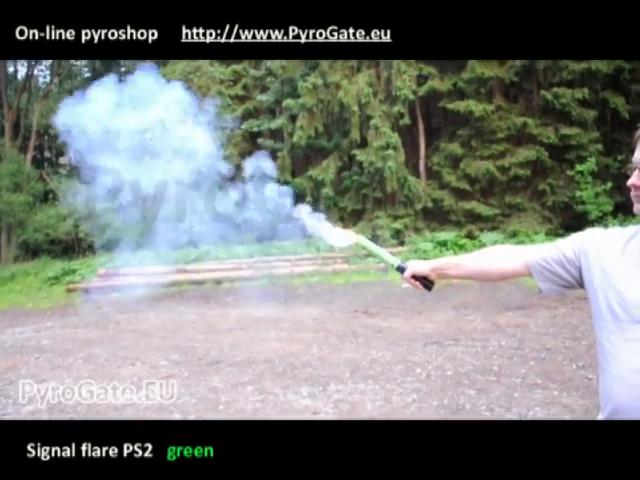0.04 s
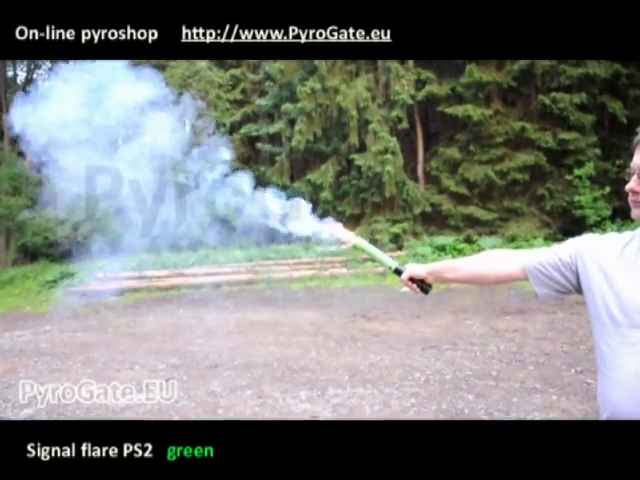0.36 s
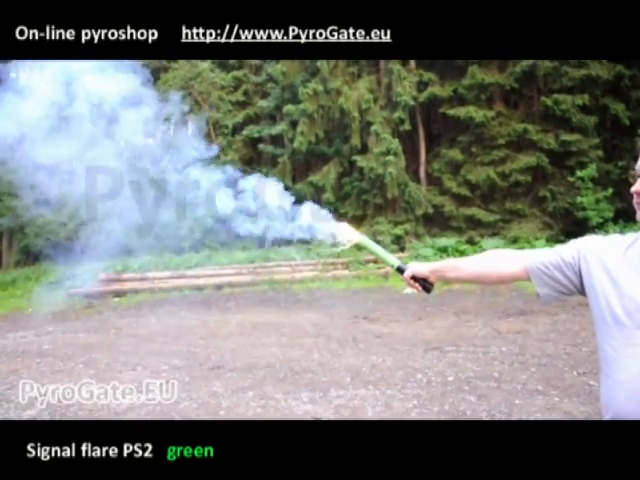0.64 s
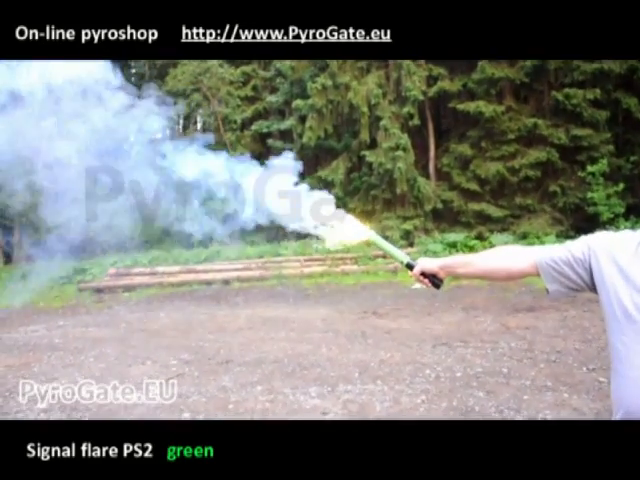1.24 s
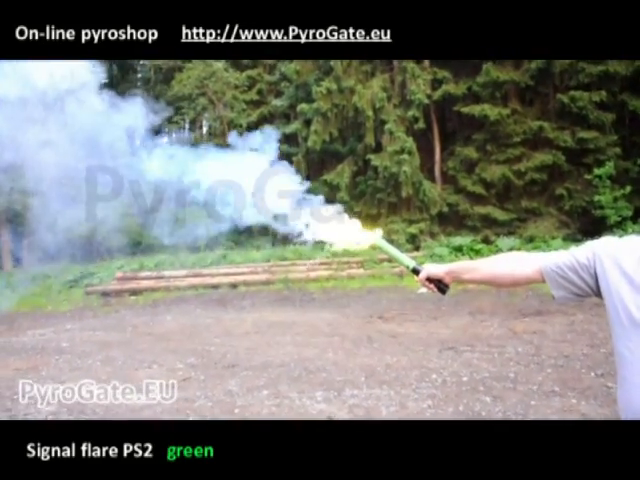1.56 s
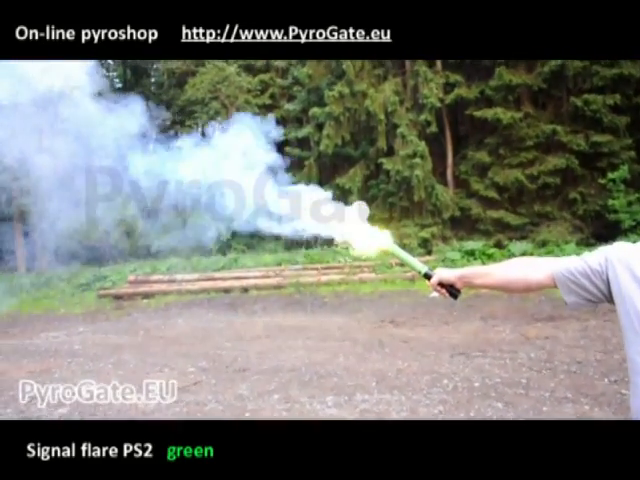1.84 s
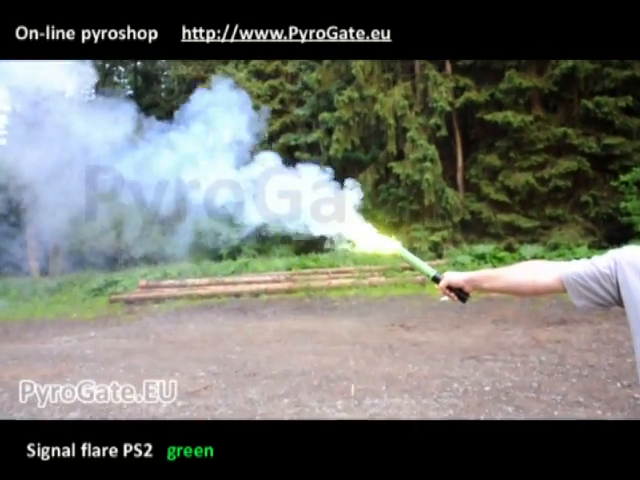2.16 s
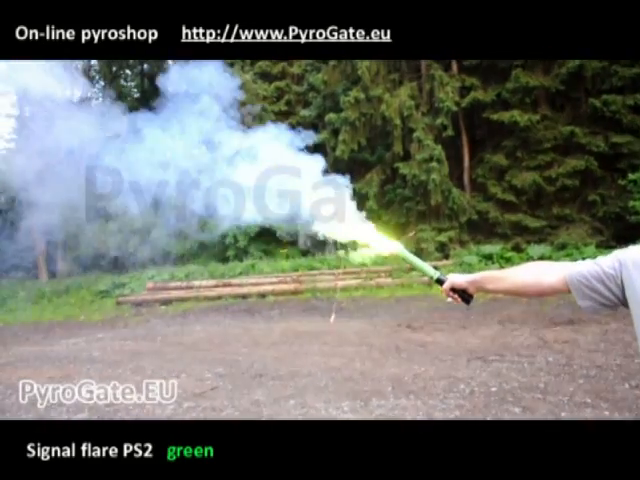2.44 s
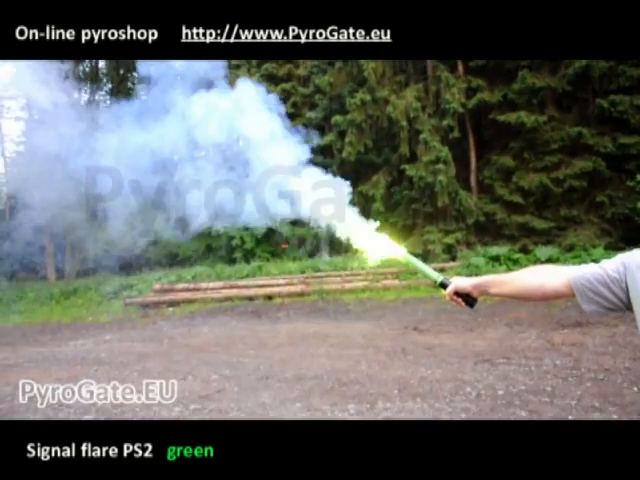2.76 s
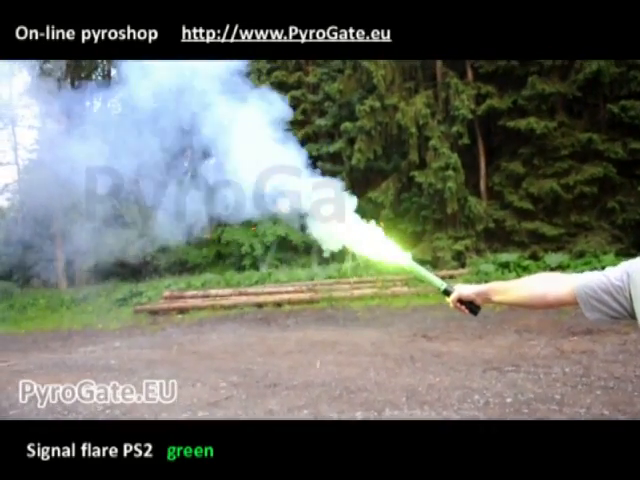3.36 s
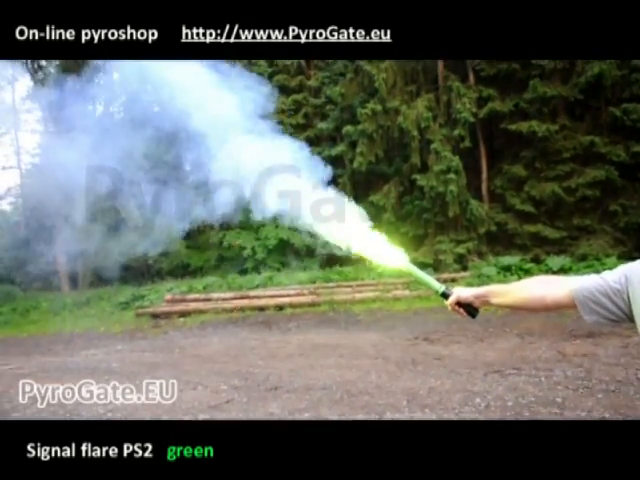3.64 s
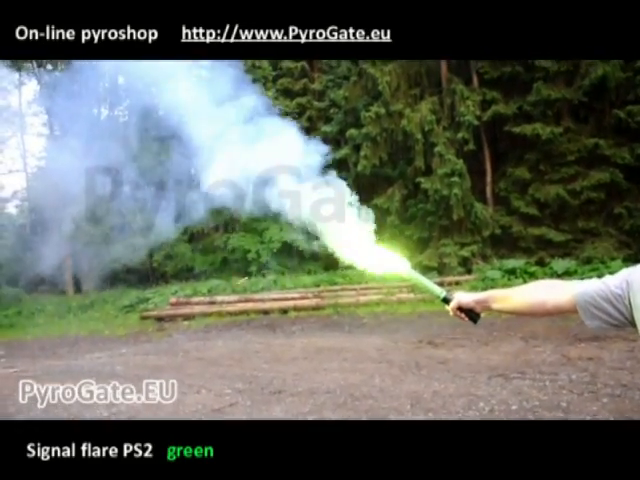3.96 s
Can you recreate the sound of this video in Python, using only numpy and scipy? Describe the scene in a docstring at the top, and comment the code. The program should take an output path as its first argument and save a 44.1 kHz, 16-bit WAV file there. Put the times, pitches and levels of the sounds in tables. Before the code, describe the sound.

A handheld flare hisses and crackles outdoors, growing louder with a surging roar.

```python
"""A hand-held signal flare burns outdoors, at arm's length from the microphone.
From the start its gas jet hisses, squeaks and crackles over a faint rumble of open air.
Early on and up to 2.6 s, single grains snap, and sparks spurt and zip away.
From about 1.2 s the growing flame roars in surges, while the tiny bursts of the burning charge
crowd ever closer until they merge with the hiss. Ground, holder and trees reflect the sound."""
import sys
import numpy as np
from scipy import signal
from scipy.fft import rfft, irfft, next_fast_len
from scipy.io import wavfile
from scipy.ndimage import uniform_filter1d, map_coordinates

SR = 44100
rng = np.random.default_rng(int(sys.argv[2]) if len(sys.argv) > 2 else 0)


def generate_wav(signal):
    """Clip the signal to [-1, 1] and save it as 16-bit WAV at the path in sys.argv[1]."""
    frames = np.transpose(np.atleast_2d(signal))
    scaled = np.clip(frames, -1, 1) * 32767
    pcm = np.round(scaled).astype(np.int16)
    wavfile.write(sys.argv[1], SR, pcm)


N = 176400  # 4 s


def amp(db):
    """Decibels to gain."""
    return 10 ** (np.asarray(db) / 20)


def unit(x):
    """Scale to rms 1."""
    return x / np.sqrt(np.mean(x ** 2) + 1e-20)


def seconds():
    """The time of each sample."""
    return np.arange(N) / SR


def curve(rows):
    """(time [s], value) points joined by straight lines."""
    return np.interp(seconds(), *np.transpose(rows))


def wobble(knots_per_s):
    """A smooth random curve."""
    return map_coordinates(rng.standard_normal(4096), [seconds() * knots_per_s], mode="wrap")


def filtered(x, response):
    """x through a response given as a function of frequency."""
    size = next_fast_len(N + 8192)
    return irfft(rfft(x, size) * response(np.fft.rfftfreq(size, 1 / SR)), size)[:N]


def coloured(x, spectrum):
    """x through a spectrum of (frequency [Hz], gain [dB]) points."""
    hz, db = np.transpose(spectrum)
    return filtered(x, lambda f: amp(np.interp(np.log(f + 1), np.log(hz), db)))


def rush(spectrum, patchy_db):
    """Turbulent noise of rms 1, with patches of random gain in frequency and time."""
    cells = signal.stft(rng.standard_normal(N), nperseg=512)[2]
    patches = uniform_filter1d(rng.standard_normal(cells.shape), size=5, axis=0)
    patches = uniform_filter1d(patches, size=8, axis=1)
    noise = signal.istft(cells * amp(patchy_db * unit(patches)), nperseg=512)[1][:N]
    return unit(coloured(noise, spectrum))


# the open air around the microphone (frequency [Hz], relative level [dB])
AIR_SPECTRUM = [(20, -18.5), (45, -4.5), (80, -4), (200, 4), (500, -8.5), (2000, -34)]
def open_air(level_db=-64.5):
    """The air of the clearing rumbles faintly and steadily."""
    return amp(level_db) * rush(AIR_SPECTRUM, patchy_db=0.5)


# the gas hiss at arm's length (frequency [Hz], relative level [dB])
HISS_SPECTRUM = [(100, -29), (700, -14.5), (1500, -14.5), (2200, -6.5), (2900, -5.5), (3500, 0),
                 (4300, 1.5), (5000, -1.5), (5500, -4.5), (6100, -3), (7000, -19)]
def hiss(start_db=-5.5, db_per_s=0.6):
    """Turbulent gas streams out of the flare."""
    return amp(start_db + db_per_s * seconds()) * rush(HISS_SPECTRUM, patchy_db=1.5)


# one burst of the charge, heard close up (frequency [Hz], relative level [dB])
BURST_SPECTRUM = [(100, -33.5), (700, -27.5), (1500, -9.5), (2800, -7.5), (3600, -2.5), (4400, -0.5),
                  (4900, 3.5), (5500, 1.5), (6100, -5), (7000, -14)]
def bursts(per_s, spread_db=10.5, limit_sigmas=1.66):
    """Pressure kicks of widely varying size at random moments; rms 1, equally strong at any rate."""
    chance = np.clip(per_s / SR, 1e-4, 1)
    fired = rng.random(N) < chance
    sizes = amp(spread_db * np.minimum(rng.standard_normal(N), limit_sigmas))
    kicks = fired * sizes * rng.choice([-1, 1], N) / np.sqrt(chance)
    return unit(coloured(kicks, BURST_SPECTRUM))


def crackle(start_per_s=1500, doubling_s=1.5, start_db=-1.5, db_per_s=-0.64):
    """Tiny bursts of the charge come ever denser as the burn spreads."""
    t = seconds()
    gain_db = start_db + db_per_s * t + 1.6 * wobble(220)
    return amp(gain_db) * bursts(start_per_s * 2 ** (t / doubling_s))


def squeaks(per_s=380, centre_hz=4998, decay_s=0.0018, spread_db=2.5, gain_db=-9):
    """Gas squeaks out of tiny pores in the charge: whistles of a few milliseconds, each at its own pitch."""
    gap, pitch, life, size = rng.standard_normal((2400, 4)).T[:, :, None]
    start_s = np.cumsum(np.abs(gap), axis=0) * np.sqrt(np.pi / 2) / per_s
    t = np.arange(SR // 50) / SR
    age = t / (decay_s * np.exp(0.48 * life))
    hz = centre_hz * np.exp(0.08 * pitch)
    whistles = amp(spread_db * size) * age * np.exp(-age) * np.sin(2 * np.pi * hz * t)
    samples = (start_s * SR).astype(int) + np.arange(len(t))
    return amp(gain_db) * unit(np.bincount(samples.ravel(), whistles.ravel(), N)[:N])


# strength of the jet, an arm's length from the microphone (time [s], level [dB])
JET_STRENGTH = [(0, -45.5), (0.2, -47), (0.25, -44), (0.43, -47.5), (0.6, -45.5), (0.83, -45.5),
                (0.98, -42.5), (1.45, -42.5), (1.9, -39.5), (2.2, -39.5), (2.45, -36.5), (2.62, -35.5),
                (2.8, -36.5), (3.14, -33), (3.3, -36), (3.34, -31.5), (3.52, -34), (3.6, -32), (3.7, -36),
                (3.75, -33), (3.82, -34), (4.0, -35)]
def jet():
    """Hiss, crackle and squeaks share the gas jet's rising, fluttering strength."""
    strength_db = curve(JET_STRENGTH) + 0.61 * wobble(15) + 0.8 * wobble(70)
    return amp(strength_db) * (hiss() + crackle() + squeaks())


# surges of the flame's roar and of its plume, at the same distance (time [s], level [dB])
ROAR_SURGES = [(0, -59.5), (0.4, -59.5), (0.62, -56.5), (1.1, -56), (1.25, -47), (1.42, -54.5),
               (1.8, -53.5), (1.86, -49.5), (2.32, -48), (2.42, -42.5), (2.55, -49.5), (2.68, -42.5),
               (2.85, -48.5), (2.92, -40.5), (3.12, -43.5), (3.35, -39.5), (3.55, -41.5), (3.82, -38),
               (4.0, -42)]
PLUME_SURGES = [(0, -57), (0.2, -61.5), (0.25, -51.5), (0.42, -61), (0.6, -54.7), (0.85, -60.5),
                (1.15, -55), (1.25, -46), (1.38, -53.5), (1.8, -55), (1.86, -46), (2.3, -49), (2.42, -49),
                (2.7, -42.5), (2.85, -50), (2.92, -39.5), (3.1, -43.5), (3.38, -38.5), (3.55, -40.5),
                (3.84, -34), (4.0, -36.5)]
# the low roar and the brighter plume (frequency [Hz], relative level [dB])
ROAR_SPECTRUM = [(25, -42.5), (50, -28), (95, -17.5), (135, -4.5), (190, 0.5), (260, 3.5), (325, -3.5),
                 (400, -4), (480, -10.5), (600, -8), (900, -8), (3000, -34)]
PLUME_SPECTRUM = [(200, -18.5), (330, -16), (400, -4), (470, -15), (540, 0.5), (700, 1.5), (880, -7.5),
                  (1050, -2), (1700, -3.5), (2200, -4), (3000, -10), (6000, -23.5)]
def flame(roar_gain_db=-0.5, plume_gain_db=-1.5):
    """The flame's low roar and the plume's brighter rush swell in surges and flutter together."""
    roar = amp(roar_gain_db + curve(ROAR_SURGES)) * rush(ROAR_SPECTRUM, patchy_db=1.04)
    plume = amp(plume_gain_db + curve(PLUME_SURGES)) * rush(PLUME_SPECTRUM, patchy_db=1.14)
    flutter = amp(1.1 * wobble(55))
    return flutter * (roar + plume)


# grains snapping close to the microphone (time [s], relative level [dB])
GRAIN_SNAPS = [(0.0338, -29), (0.0907, -29), (0.1196, -31), (0.157, -29), (0.2374, -25), (0.2583, -26),
               (0.2954, -30), (0.6918, -30), (0.7088, -25), (1.0181, -20), (1.1124, -25), (1.1638, -25),
               (1.3962, -27), (1.4376, -24), (1.4935, -25), (1.735, -25), (2.1919, -23), (2.4494, -21),
               (2.6214, -19)]
def snaps(gain_db=9):
    """Single large grains burst with one sharp kick each."""
    kicks = np.zeros(N)
    for time_s, db in GRAIN_SNAPS:
        kicks[round(time_s * SR)] = amp(db + gain_db)
    return 2 * coloured(kicks, BURST_SPECTRUM)


# spurts of sparks at the flare (time [s], length [s], level [dB])
SPARK_SPURTS = [(.035, .004, -43), (.259, .008, -42), (1.02, .02, -43), (2.452, .02, -39),
                (2.622, .015, -37)]
def spurts():
    """Brief showers of sparks swell and die."""
    t = seconds()
    swell = sum(amp(db) * np.exp(-2 * ((t - time_s) / length_s) ** 2)
                for time_s, length_s, db in SPARK_SPURTS)
    return swell * bursts(per_s=6000)


# sparks flying off into the open (time [s], length [s], pitch [Hz], level [dB])
SPARK_ZIPS = [(.0505, 0.0014, 2250, -37), (2.221, 0.0078, 2110, -41)]
def zips(fall_hz_per_s=20000):
    """Each flying spark whistles for a few milliseconds, falling in pitch."""
    whistles = np.zeros(N)
    for time_s, length_s, hz, db in SPARK_ZIPS:
        t = seconds() - time_s
        swell = amp(db) * np.exp(-2 * (t / length_s) ** 2)
        whistles += swell * np.sin(2 * np.pi * (hz - fall_hz_per_s * t / 2) * t)
    return whistles


# reflections reaching the microphone from ground and holder (delay [ms], gain [ratio])
NEAR_ECHOES = [(1.79, .26), (1.98, .12), (4.68, .19)]
def outdoors(x, dull_above_hz=6000, trees_db=-22, trees_t60_s=0.4):
    """Close reflections, duller than the direct sound, comb it; the trees return a weak diffuse tail."""
    def comb(f):
        echoes = sum(gain * np.exp(-2j * np.pi * f * ms / 1000) for ms, gain in NEAR_ECHOES)
        return 1 + echoes / (1 + (f / dull_above_hz) ** 4)

    t = np.arange(SR // 2) / SR
    tail = rng.standard_normal(len(t)) * amp(-60 * t / trees_t60_s) * (t > 0.008)
    trees = signal.fftconvolve(x, tail / np.linalg.norm(tail))[:N]
    return filtered(x, comb) + amp(trees_db) * trees


def scene():
    """The flare in its clearing, in mono from arm's length."""
    air = open_air()
    flare = jet() + flame() + snaps() + spurts() + zips()
    return (air + outdoors(flare))[None]


# pass band of the recorder behind the microphone (frequency [Hz], gain [dB])
RECORDER_BAND = [(20, -12.5), (50, 0), (100, 2.5), (6000, 0), (6500, -3.5), (7000, -5.5), (7400, -20.5),
                 (7800, -47), (8200, -88)]
# its leak above that band (frequency [Hz], gain [dB])
MIRROR_LEAK = [(8000, -91.5), (9500, -53), (11000, -59.5), (12000, -52), (13000, -40.5), (14200, -53)]
def record(dry, mirror_hz=16000, top_hz=14430):
    """A narrow-band camera recorder leaks a faint mirror image of the sound above its pass band."""
    passed = coloured(dry[0], RECORDER_BAND)
    mirrored = 2 * passed * np.cos(2 * np.pi * mirror_hz * seconds())
    leak = coloured(mirrored, MIRROR_LEAK)
    return filtered(passed + leak, lambda hz: hz < top_hz)[None]


dry = scene()
out = record(dry)
generate_wav(out)
```